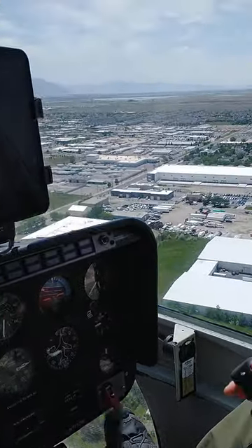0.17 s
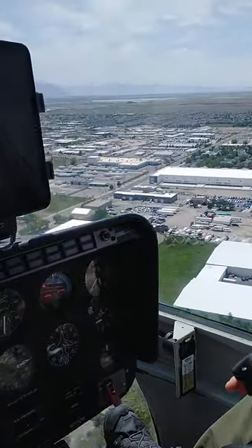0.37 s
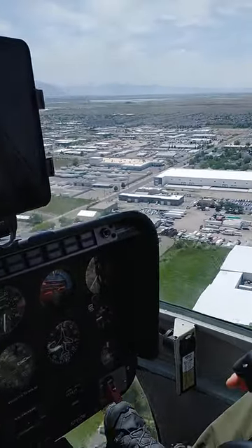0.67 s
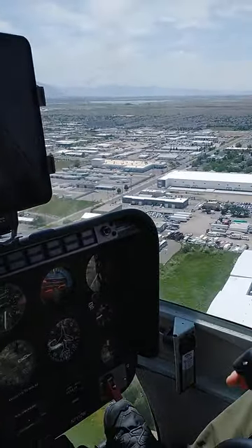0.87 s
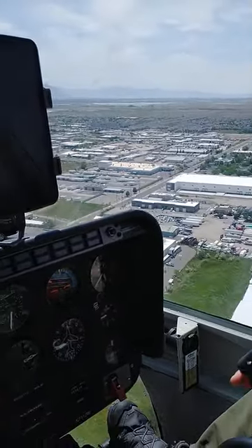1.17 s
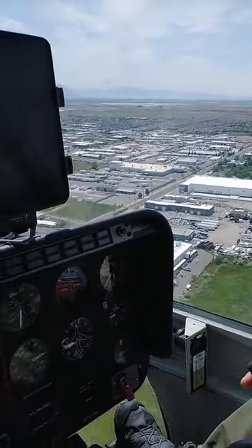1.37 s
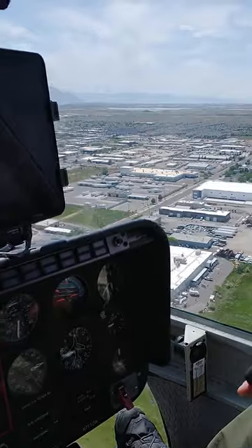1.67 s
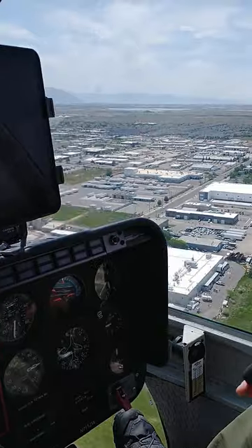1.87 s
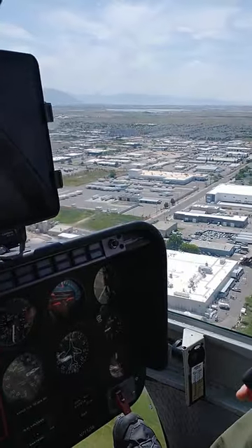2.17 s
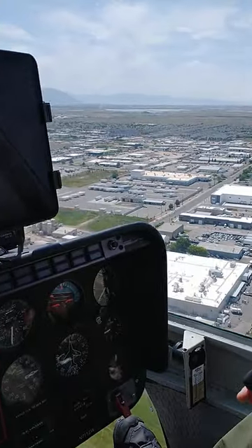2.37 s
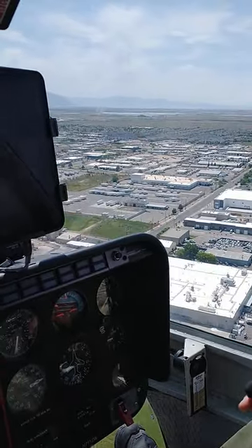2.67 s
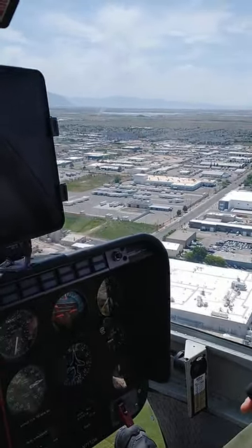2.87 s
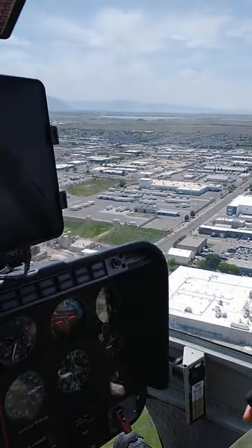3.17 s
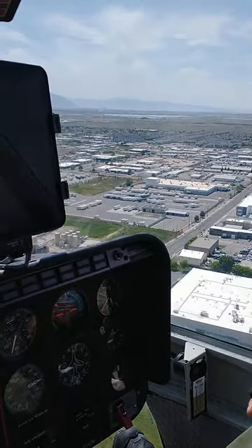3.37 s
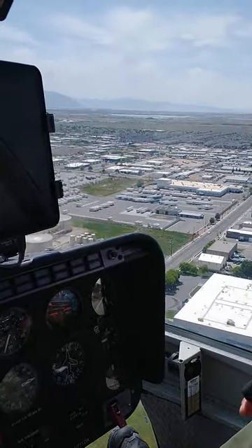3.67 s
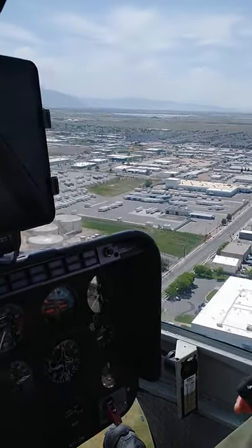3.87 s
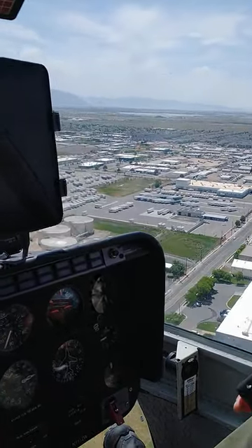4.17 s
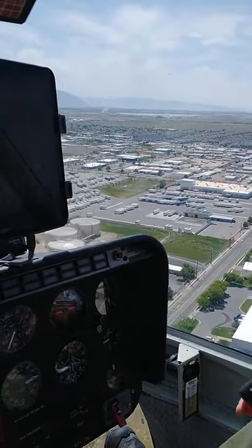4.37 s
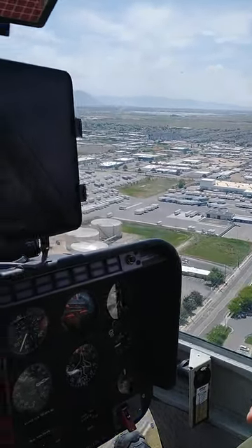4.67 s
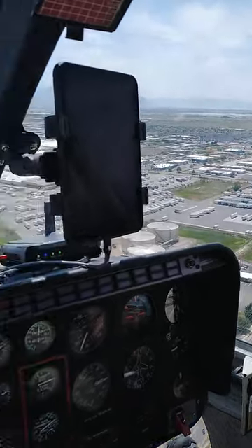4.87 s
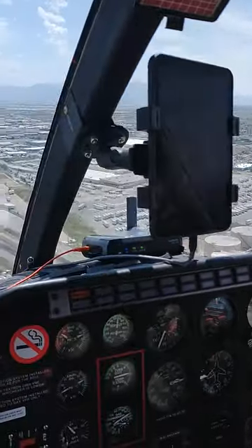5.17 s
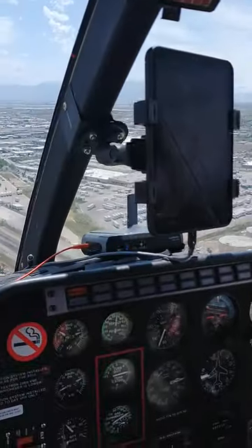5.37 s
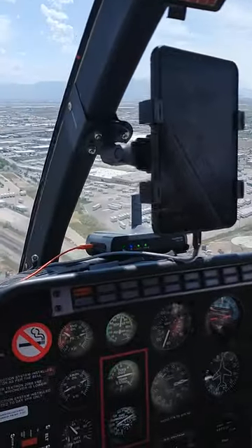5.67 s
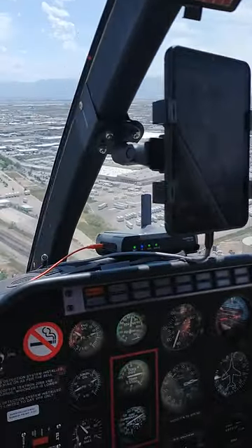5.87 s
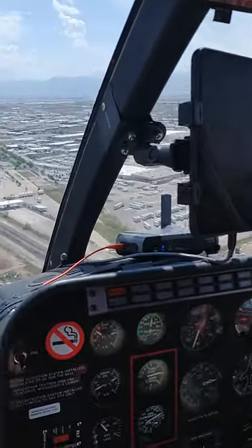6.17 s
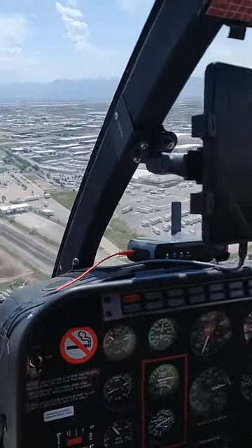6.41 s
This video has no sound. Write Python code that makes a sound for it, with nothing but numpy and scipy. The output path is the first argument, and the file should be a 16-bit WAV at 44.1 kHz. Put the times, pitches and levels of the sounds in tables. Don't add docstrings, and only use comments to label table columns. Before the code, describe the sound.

Steady helicopter flight from within a small open cabin. Fast, even blade swishes flutter over roaring, throbbing wind and airy hiss. Gearbox tones hum low and sing high, swelling and shifting between the two sides, with a faint, rough turbine whistle above. Bright chuffs lean left and weaken late on. Close stereo microphones, wind-exposed and heavily limited; no start, landing or break.

```python
import sys
import numpy as np
from scipy import signal
from scipy.fft import rfft, irfft, next_fast_len
from scipy.io import wavfile
from scipy.ndimage import uniform_filter1d, map_coordinates

SR = 44100
rng = np.random.default_rng(int(sys.argv[2]) if len(sys.argv) > 2 else 0)


def master_out(mix):
    frames = np.transpose(np.atleast_2d(mix))
    ceiling = np.clip(frames, -1, 1)
    pcm = np.round(ceiling * 32767).astype(np.int16)
    wavfile.write(sys.argv[1], SR, pcm)


def nominal_scale(level):
    x = np.asarray(level, float) / 20
    return 10 ** x


N = 288414
SECONDS = np.arange(N) / SR
HOP = 64
TEETH = 50

# start_s, share (0 to 1)
TURNED = [
    (0, 0.07),
    (2.4, 0.2),
    (3.6, 0.5),
    (4.6, 0.54),
    (6.0, 0.6),
    (6.54, 0.8),
]


def unit(x):
    return x / np.sqrt(np.mean(x ** 2) + 1e-20)


def along(points, hz):
    point_hz, value = np.transpose(points)
    return np.interp(np.log(hz + 1), np.log(point_hz + 1), value)


def curves(rows):
    start_s, *columns = np.transpose(rows)
    return [np.interp(SECONDS, start_s, column) for column in columns]


def wobble(rate):
    knots = rng.standard_normal(int(N * 40 / SR) + 4)
    return map_coordinates(knots, [np.arange(N) * min(rate, 40) / SR])


def filtered(x, response):
    size = next_fast_len(N + 8192)
    spectrum = rfft(x, size) * response(np.fft.rfftfreq(size, 1 / SR))
    return irfft(spectrum, size)[..., :N]


def shaped(gain):
    frames = dict(nperseg=4 * HOP, noverlap=3 * HOP)
    hz, t, z = signal.stft(rng.standard_normal((2, N)), SR, **frames)
    return signal.istft(z * gain(hz[:, None], t), SR, **frames)[1][:, :N]


def rush(spectrum, patchy_db):
    # pitch_hz, likeness (-1 to 1)
    likeness = [(60, 0.94), (130, 1), (290, 0.86), (640, 0.38), (1410, -0.21), (3100, 0.17), (6820, -0.03),
                (15000, -0.017)]
    # pitch_hz, left_minus_right_db
    balance = [(60, -1.2), (200, -.5), (900, -1), (2400, 0), (5000, -2.5), (9000, 3), (15000, -0.5)]

    def patches(hz, t):
        field = rng.standard_normal((len(hz), len(t)))
        field = uniform_filter1d(field, size=3, axis=0)
        return nominal_scale(patchy_db * unit(uniform_filter1d(field, size=40, axis=1)))

    def middle_and_side(hz):
        angle = np.arccos(np.clip(along(likeness, hz), -1, 1)) / 2
        return nominal_scale(along(spectrum, hz)) * [np.cos(angle), np.sin(angle)]

    mid, side = filtered(shaped(patches), middle_and_side)
    ports = np.array([mid + side, mid - side])
    return unit(filtered(ports, lambda hz: nominal_scale(np.outer([.5, -.5], along(balance, hz)))))


def tone(turns, left_db, right_db, lead_rad, flutter_db, smear_rad):
    mean_hz = turns[-1] * SR / N
    apart = min(1, mean_hz / 900)
    rate = 5 + mean_hz / 170
    shared = np.array([wobble(rate), wobble(rate)])
    own = np.array([wobble(rate), wobble(rate)])
    drift = np.array([shared, np.sqrt(1 - apart ** 2) * shared + apart * own])
    level_db = np.array([left_db + flutter_db * drift[0, 0], right_db + flutter_db * drift[1, 0]])
    lead = np.array([0 * turns, lead_rad + 0 * turns])
    return np.sqrt(2) * nominal_scale(level_db) * np.sin(2 * np.pi * turns + smear_rad * drift[:, 1] + lead)


def beat(t, times, rise, fall):
    gap = t - times[:, None]
    return np.exp(-.5 * (gap / np.where(gap < 0, rise, fall)) ** 2)


def shaft():
    # start_s, pitch_hz
    speed = [(0, 4933.7), (.75, 4932.2), (1.25, 4929.9), (1.55, 4931.5), (2.25, 4945), (2.75, 4946.8),
             (3.0, 4943.8), (3.65, 4928.6), (4.3, 4925), (4.7, 4927), (5.45, 4945), (5.8, 4946.2),
             (6.54, 4946.2)]
    return np.cumsum(curves(speed)[0]) / SR / TEETH


def wind():
    # start_s, level_db
    gusts = [(0, -23), (.4, -18), (.9, -16.5), (1.5, -18.5), (2.7, -18), (3.1, -17), (3.85, -16.5),
             (4.15, -20.5), (4.35, -14.5), (4.8, -20.5), (5.1, -16.5), (6.0, -20), (6.54, -15.5)]
    # pitch_hz, width_hz, level_db
    cabin = [(133, 30, 2.5)]
    # pitch_hz, level_db (per Hz)
    boom_spectrum = [(25, -34), (40, -23), (54, -7.5), (90, -8.5), (175, -11.5), (230, -8), (300, -17),
                     (500, -31), (900, -58)]
    # pitch_hz, level_db (per Hz)
    rush_spectrum = [(150, -16.5), (300, -2), (500, -4.5), (700, -8), (1000, -13), (1500, -16.5),
                     (2300, -21), (4000, -33)]
    # pitch_hz, level_db (per Hz)
    hiss_spectrum = [(1200, -5.5), (2300, -10.5), (3200, 1.5), (5000, 1), (7500, 2.5), (9500, 1.5),
                     (11500, -5.5), (15800, -16)]
    lag_s = 3 / SR

    gust_db = curves(gusts)[0]
    gust_db = gust_db - gust_db.mean()

    throb_hz = 133.8 + 4 * wobble(4.5) + 8 * wobble(12)
    throb_wave = np.sqrt(2) * np.sin(2 * np.pi * np.cumsum(throb_hz) / SR)
    throb = nominal_scale(-22 + 1.7 * gust_db + 1.26 * wobble(16)) * throb_wave * nominal_scale([[-.5], [.5]])

    def resonance(hz):
        return 1 + sum(nominal_scale(db) * 1j * hz * width / (centre ** 2 - hz ** 2 + 1j * hz * width)
                       for centre, width, db in cabin)

    boom = unit(filtered(rush(boom_spectrum, patchy_db=0.25), resonance))
    boom = nominal_scale(-16 + 0.13 * gust_db + 0.41 * wobble(2.345)) * boom
    body = nominal_scale(-23 + 0.97 * wobble(7)) * rush(rush_spectrum, patchy_db=0.52)
    hiss_db = -24 + 1.4 * curves(TURNED)[0] + 0.45 * wobble(5.03)
    hiss = nominal_scale(hiss_db) * rush(hiss_spectrum, patchy_db=0.72)
    air = throb + boom + body + hiss
    return filtered(air, lambda hz: np.exp(np.outer([-1j, 1j], np.pi * hz * lag_s)))


def rotor():
    # start_s, chuff_db, chuff_pitch_hz
    tips = [(0, -17, 8650), (.5, -15.5, 9000), (1.1, -16.5, 8600), (2.0, -16, 9200), (2.5, -16, 8800),
            (2.95, -19.5, 7800), (3.1, -15.5, 8600), (3.8, -18.5, 9200), (4.52, -19, 9600),
            (4.66, -26, 9000), (5.2, -29, 8000), (5.7, -24, 9000), (6.0, -19.5, 9300), (6.54, -22, 8800)]
    # pitch_hz, level_db (per Hz)
    swish_spectrum = [(400, -3.5), (2300, -7.5), (3500, 0), (6500, 3.5), (9500, 1), (12000, -1.5),
                      (15800, -11)]
    # pitch_hz, level_db (per Hz)
    top_spectrum = [(8500, -19), (10800, -10), (13000, -1), (15900, -0.5)]
    turned_curve, = curves(TURNED)

    passes = .13134 * shaft()
    blade = np.arange(int(passes[-1]) + 1)
    even_s = np.interp(blade + .655, passes, SECONDS)
    late, off_pitch, left, right = rng.standard_normal((len(blade), 4)).T
    pass_s = even_s + .0015 * late
    at_pass = (even_s * SR).astype(int)
    size_db, pitch_hz, turned = (c[at_pass] for c in curves(tips) + [turned_curve])

    which = (-1.) ** blade
    scatter_db = .6 + .13 * (size_db.max() - size_db)
    left_db = size_db + 0.14 * which + scatter_db * left
    right_db = size_db - 12 + 7 * turned + 2 * which + scatter_db * right
    centre_hz = pitch_hz - 470 * which + 130 * off_pitch

    def chuff(hz, t):
        near = np.abs(t - pass_s[:, None]).argmin(axis=0)
        glide = centre_hz[near] + 55000 * (t - pass_s[near])
        core = np.exp(-.5 * ((hz - glide) / 750) ** 2)
        skirt = np.exp(-.5 * ((hz - glide + 1500) / 2000) ** 2)
        main = beat(t, pass_s - .001, rise=.0035, fall=.0095).sum(axis=0) * (core + 0.24 * skirt)
        early = beat(t, pass_s - .027, rise=.007, fall=.009).sum(axis=0)
        early = early * np.exp(-.5 * ((hz - 8300) / 600) ** 2)
        return nominal_scale([left_db[near], right_db[near]])[:, None] * (main + 0.28 * early)

    even_s = np.append(2 * even_s[0] - even_s[1], even_s)
    sizes = nominal_scale(.9 * rng.standard_normal((len(even_s), 2)))
    coarse_s = np.arange(0, N + HOP, HOP) / SR

    def swell(size, times, rise, fall):
        return np.interp(SECONDS, coarse_s, size @ beat(coarse_s, times, rise, fall))

    swish = swell(sizes[:, 0], even_s + 0.016, 0.015, 0.013) * rush(swish_spectrum, patchy_db=1.5)
    swish = nominal_scale(-22.5 + 1.5 * turned_curve + 1.2 * wobble(2.41)) * swish
    top = swell(sizes[:, 1], even_s + 0.013, 0.011, .0125) * rush(top_spectrum, patchy_db=3.0)
    top = nominal_scale(-28.5 + 0.5 * turned_curve) * top
    leak = np.array([[0.93, 0.094], [0.14, 1]])
    return nominal_scale(12.0) * leak @ shaped(chuff) + swish + top


def gearbox():
    # start_s, left_db, right_db, right_lead_rad
    whine = [(0, -29, -35, -1.5), (.15, -29, -34, -1), (.45, -43, -37, -1), (1.15, -43, -25, -2.2),
             (1.8, -39, -37, -2), (2.15, -32, -29, -2), (2.45, -32, -27, -2.5), (2.85, -35, -29, -2.7),
             (3.35, -38, -37, -.3), (3.6, -35, -27.5, -.8), (4.1, -37, -31, -3), (4.5, -33, -26, -3.5),
             (4.75, -34, -18, -4.8), (5.05, -35, -19, -6.6), (5.4, -42, -30, -3.2), (5.6, -36, -25, -6.2),
             (6.12, -28, -29, -6.8), (6.33, -33, -44, -4.5)]
    # start_s, lower_tone_db, upper_tone_db
    mast = [
        (0, -35, -34),
        (1, -43, -33),
        (2.5, -37, -34),
        (3.7, -44, -36.5),
        (5, -38, -31),
        (6.1, -30, -28),
        (6.54, -29, -29),
    ]
    # shaft_multiple, left_db, right_db, right_lead_rad
    mesh = [(2, -22.5, -22.5, .15), (3.396, -35, -36, -.4), (9.852, -58, -42, 2.2), (12.434, -53, -52, -.8),
            (12.742, -47, -53, 1.1), (12.87, -45, -50, 1.4), (13, -39, -40, .7), (13.132, -55, -49, 1.1),
            (15, -55, -54, 1), (17, -52, -48, 1.7), (18.738, -52, -50, 2.3), (19, -44, -39, .5),
            (19.262, -56, -50, 1.7), (19.44, -50, -53, .6), (19.698, -60, -48, -2.7), (6.7, -50, -44, 0),
            (38, -54, -53, -1.6), (48, -54, -52, 2.8), (49.866, -53, -46, 3.1), (52, -55, -51, 1.4)]
    fades = {13: (2, -6), 19: (3, -4.5), 9.852: (3.5, -11)}

    turns = shaft()
    turned, = curves(TURNED)
    low_right_db, up_right_db = curves(mast)
    sound = tone(TEETH * turns, *curves(whine), flutter_db=1.3, smear_rad=.12)
    low_lead = 2.7 - 3.2 * turned
    sound += tone(6.436 * turns, -29.7, low_right_db + .5, low_lead, flutter_db=.6, smear_rad=.1)
    up_turns = 6.56734 * turns + .40
    sound += tone(up_turns, -45 + 6 * turned, up_right_db - .5, -.3, flutter_db=.8, smear_rad=.15)
    for order, left_db, right_db, lead in mesh:
        ahead_db, turned_db = fades.get(order, (0, 0))
        right_db = right_db + ahead_db + turned_db * turned
        flutter_db = min(2.2, .8 + order / 8)
        sound += tone(order * turns, left_db, right_db, lead, flutter_db, smear_rad=.25)
    return nominal_scale(-1.14) * sound


def turbine():
    # start_s, pitch_hz
    compressor = [
        (0, 12548),
        (1.2, 12575),
        (2.1, 12603),
        (2.5, 12604),
        (3.5, 12564),
        (4.5, 12618),
        (5.1, 12651),
        (5.7, 12668),
        (6.3, 12653),
    ]
    # start_s, left_db, right_db
    whistle = [
        (0, -43, -43),
        (2, -47, -43),
        (2.6, -51, -50),
        (6.54, -53, -47),
    ]
    turns = np.cumsum(curves(compressor)[0]) / SR
    return tone(turns, *curves(whistle), -.5, flutter_db=3, smear_rad=.9)


def scene():
    return wind() + rotor() + gearbox() + turbine()


def roll_off(x):
    return signal.sosfilt(signal.butter(12, 15900, fs=SR, output="sos"), x)


def record(dry):
    low = filtered(dry.mean(axis=0), lambda hz: 1 / (1 + (hz / 600) ** 2))
    power = np.abs(uniform_filter1d(low ** 2, size=400))
    loud = nominal_scale(2.5) * (1 + power / 0.032) ** -.3 * dry
    soft = loud / (1 + np.abs(loud / .93) ** 8) ** (1 / 8)
    return roll_off(filtered(soft, lambda hz: hz < 15880))


dry = scene()
out = record(dry)
master_out(out)
```